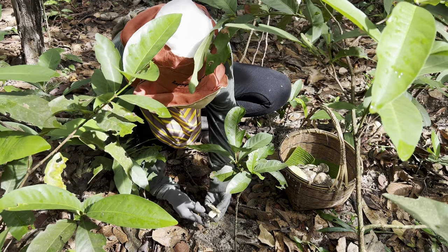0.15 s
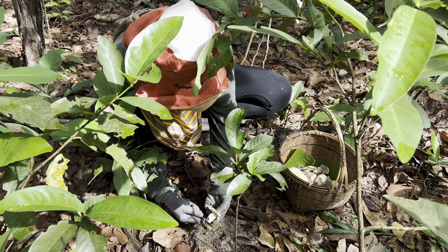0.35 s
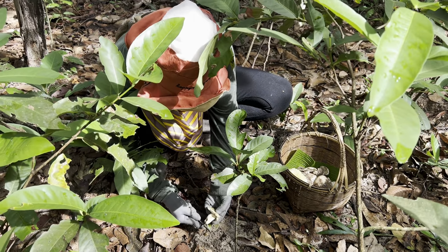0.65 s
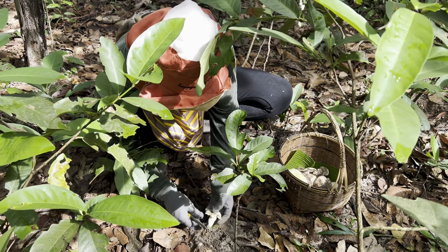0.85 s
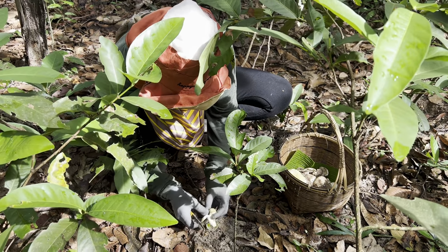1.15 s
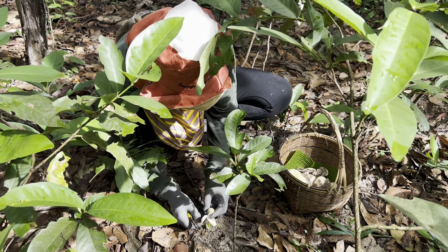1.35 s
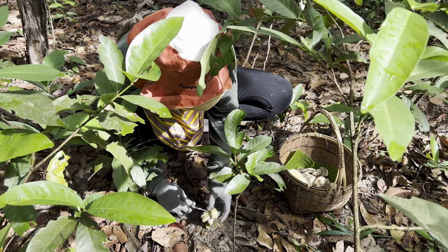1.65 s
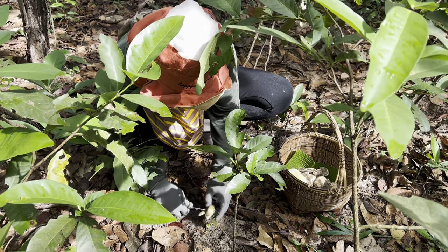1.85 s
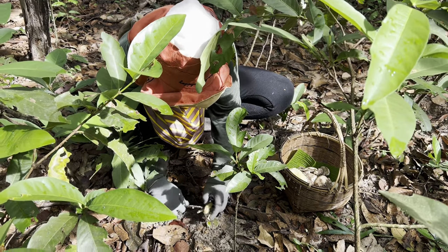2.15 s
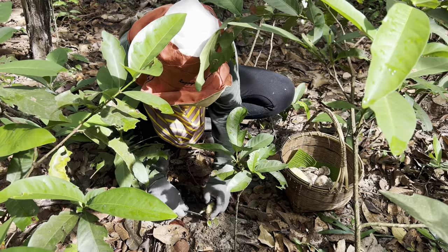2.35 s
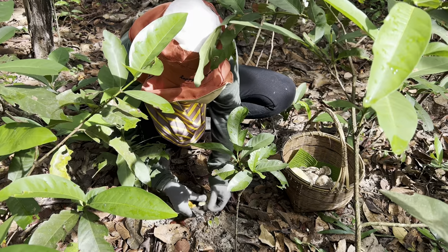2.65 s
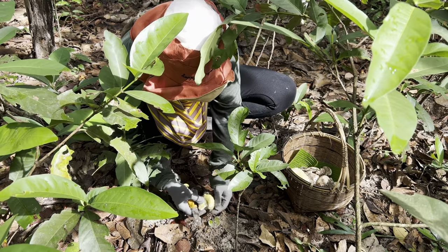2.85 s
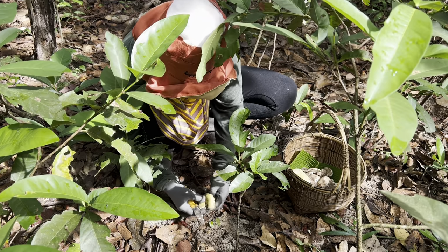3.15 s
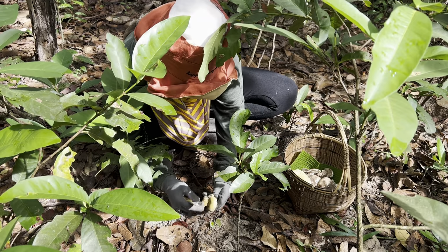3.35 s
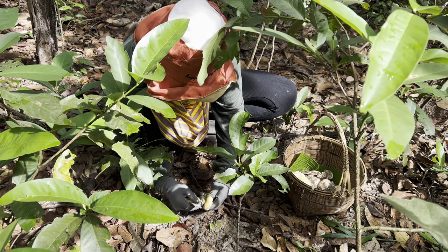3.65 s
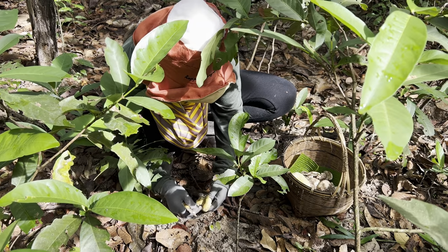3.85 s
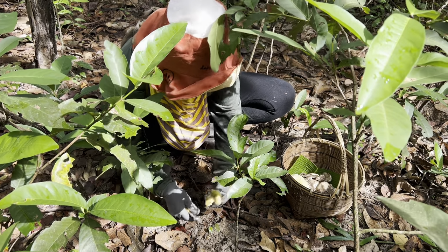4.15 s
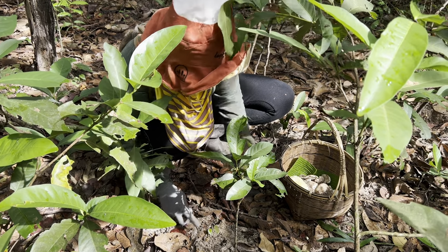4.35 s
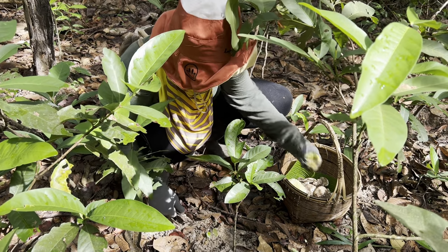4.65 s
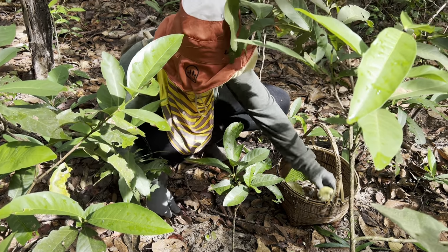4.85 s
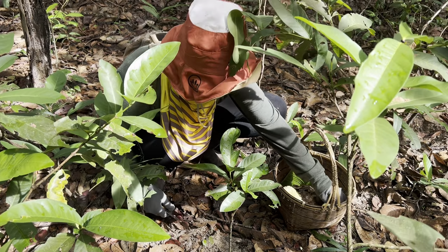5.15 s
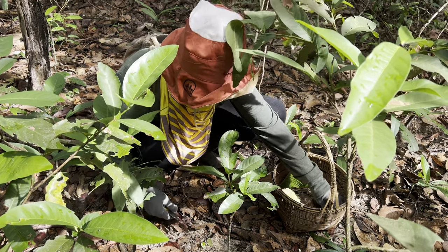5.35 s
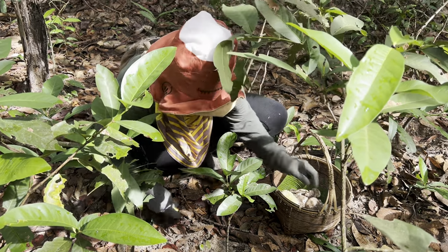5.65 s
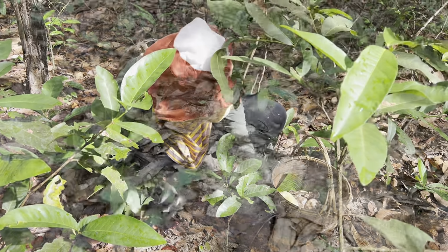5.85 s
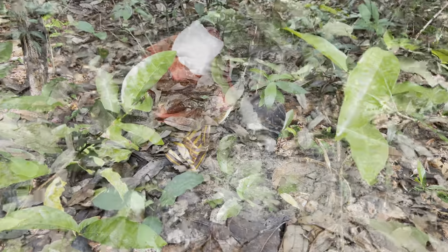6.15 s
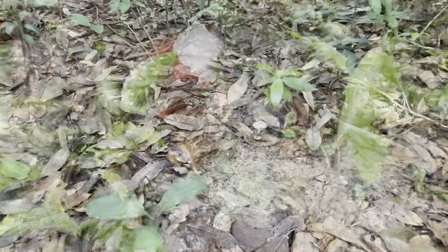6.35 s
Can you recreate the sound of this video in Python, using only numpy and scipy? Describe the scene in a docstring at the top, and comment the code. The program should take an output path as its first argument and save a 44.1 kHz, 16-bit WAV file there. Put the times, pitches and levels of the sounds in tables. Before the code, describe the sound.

A stereo microphone among foliage catches shrill cicadas pulsing rapidly on the left, with low engine-like rumble far behind. Clear short bird whistles glide up and down at the start, echoing off trunks, then stop. Very faint distant birds keep calling. A gloved forager's hands barely stir dry leaves, with sparse ticks and soft rustles after four seconds, before sudden louder crunching steps through leaf litter close the scene.

```python
"""A chorus of cicadas drones to the left while a near bird whistles gliding notes among the trunks.
Behind them far birds call, a distant motor rumbles, dry leaves tick under hands, and at the end
someone wades through the litter. Cicadas are sums of overtones of unsteady click rates, birds are
gliding near-sines, ticks are short coloured noise bursts, and litter and air are shaped noise;
random echoes off trunks and leaves surround the cicadas, birds and ticks."""
import sys
import numpy as np
from scipy import signal
from scipy.fft import rfft, irfft
from scipy.io import wavfile
from scipy.ndimage import uniform_filter1d

SR = 44100
rng = np.random.default_rng(int(sys.argv[2]) if len(sys.argv) > 2 else 0)


def unload_wav(signal):
    """Save mono or channel-first audio to the path in sys.argv[1] as 16-bit WAV at rate SR, clipped to [-1, 1]."""
    wavfile.write(
        sys.argv[1],
        SR,
        np.round(np.clip(np.atleast_2d(signal).T, -1, 1) * 32767).astype(np.int16),
    )


N = 286650  # samples, 6.5 s

# rumble and far forest hush: frequency_hz, relative_density_db
AIR_SPECTRUM = [(15, -45), (25, -28), (41, -10), (64, 0), (166, -17), (216, -30), (350, -35.5),
                (863, -37.5), (1050, -39.5), (2430, -42), (3690, -43.5), (4400, -45.5), (4900, -37.5),
                (6240, -69.5), (8200, -52.5), (9300, -56), (11000, -69.5)]
# swell of the bass: time_s, gain_db
RUMBLE_SWELL = [(0, -1.0), (1.0, -1), (3.3, 1.5), (5.8, -0.2), (6.5, 4.5)]
# likeness of the two ears' noises: frequency_hz, likeness_0_to_1
EAR_LIKENESS = [(60, 0.99), (250, 0.96), (600, 0.25), (1200, 0.2), (3000, 0.041)]
# colour of the leaf litter: frequency_hz, relative_density_db
LITTER_SPECTRUM = [(88, -31.5), (150, -6.5), (238, -8.5), (691, -3), (927, 0), (1070, -4), (1800, -3.5),
                   (2530, 2), (4500, -5.5), (9500, -16), (15000, -16)]
# bands of big, middle, small leaves and crumbs: low_hz, high_hz
LEAF_BANDS = [(120, 1400), (1400, 4500), (4500, 10200), (10200, 16000)]
# hands stirring the litter: start_s, level_db, hold_s, big_against_middle_leaves_db
STIRS = [(4.195, -71, 0.27, -0.5), (4.702, -61, 0.087, -7.5), (4.902, -74, 0.42, -7.5),
         (5.441, -63, 0.097, -2.5), (5.586, -74, 0.25, 0.5)]
# wading through the litter: time_s, level_db, small_against_middle_leaves_db
WADING = [(5.85, -71, -1), (5.858, -50.5, -5), (5.916, -54.5, 6), (5.946, -45, 3.5), (6.132, -46, 1.5),
          (6.188, -39.5, -4.5), (6.24, -45, 0.5), (6.418, -50, -2.5), (6.44, -44, 1), (6.5, -50, -5)]
# leaf and twig ticks: start_s, peak_before_panning_db, centre_hz, left_minus_right_db
TICKS = [(0.533, -42.5, 2060, 3), (1.768, -54, 1940, 6), (2.298, -50, 1734, 2), (2.469, -47.5, 579, 13),
         (3.153, -53, 13000, 0), (3.477, -50, 4780, 8), (3.605, -45.5, 4400, 10), (4.119, -51, 12500, 0),
         (4.292, -40.5, 2970, 7), (4.712, -46, 2980, 12), (5.018, -50.5, 813, 9), (5.26, -43.5, 1020, 3),
         (5.284, -44.5, 4830, -3), (5.425, -43.5, 2730, 7), (5.462, -42.5, 1470, 7),
         (5.513, -42.5, 2290, 15), (5.859, -35.5, 840, 8), (5.921, -40, 2310, 13), (5.964, -43, 2480, 5),
         (6.02, -27, 3150, 12), (6.163, -27, 2900, 4), (6.183, -28, 3170, 16), (6.223, -30.5, 775, -7),
         (6.315, -32.5, 3080, 8), (6.436, -27, 7000, 9)]
# call shapes: share_of_length, pitch_ratio, gain_db
ARCH = [(0, .62, -28), (.28, .8, -15), (.4, 0.97, -4), (.53, 1, 0.5), (.82, .89, -3.5), (.9, .85, -17),
        (1, 0.68, -28)]
CLIMB = [(0, .79, -18), (.15, .89, 3), (.4, 1.01, -1), (.5, .92, 0.5), (.72, 1.09, -3), (1, .94, -7.5)]
FLICK = [(0, .95, -16), (.22, 1.01, -0.5), (.58, .96, -7.5), (.72, 1.08, -5), (.84, 1.24, -14),
         (1, 1.1, -37.5)]
SLUR = [(0, 1.08, -3), (.2, 1, -1), (.8, .67, -3), (1, .6, -12)]
PIP = [(0, 1.08, 0), (1, .9, -3)]
BUZZ = [(0, 1, 0), (.1, 1, -5.5), (.63, 1, 1.5), (.78, 1.12, -2.5), (1, 1.04, -9)]
CROAK = [(0, 0.98, -7), (.08, 0.98, -1), (.92, .97, -7.5), (1, 1, -15)]
# near whistler: shape_name, start_s, length_s, pitch_hz, level_before_beak_and_echoes_db, bend_exponent
WHISTLER_NOTES = [("arch", -.024, .125, 1700, -29, 1.1), ("climb", .187, .155, 1270, -38, 0.96),
                  ("flick", .312, .112, 2040, -30, .45), ("arch", 0.96, .135, 1880, -27, 1.05),
                  ("arch", 1.148, .122, 1750, -25.5, 0.94), ("climb", 1.36, .15, 1280, -37, 1.05),
                  ("flick", 1.508, .112, 1990, -35.5, 1.07)]
# filtering by the whistler's beak: frequency_hz, gain_db
BEAK = [(800, 0), (2600, -1), (3000, -5), (3700, -14), (4100, -32), (6000, -44)]
# far bird, falling slurs: start_s, level_before_echoes_db
FAR_SLURS = [(.52, -69), (.875, -67), (2.96, -68), (3.30, -68), (3.665, -67), (4.025, -67), (4.385, -67),
             (4.74, -69), (5.085, -64), (5.775, -68)]
# far bird, short pips: start_s, pitch_hz, level_before_echoes_db
FAR_PIPS = [(3.4994, 2050, -68.5), (3.6651, 2030, -69.5), (3.7494, 1910, -75), (3.9292, 1910, -72),
            (4.364, 1970, -73)]
# singing males: click_rate_hz, relative_level_db, rate_wobble_share, throb_rate_hz
CICADAS = [(1272, -9, .008, 12.0), (1290, -17, .004, 12.1), (1306, -15, .005, 12.5),
           (1323, -15, .005, 11.8), (1342, -11, .004, 12.4), (1360, -1, .003, 12.2), (1373, -4, .004, 12.6),
           (1387, -1, .003, 12.3), (1395, -6, .002, 12.0), (1405, -13, .002, 12.4),
           (1416, -10, .0015, 12.1), (1425, -6, .002, 12.3)]
# sound let out by drum and belly: frequency_hz, gain_db, left_minus_right_db
BELLY = [(5027, -21.5, 13), (5660, -31.5, 9), (6339, -32.5, 0), (6397, -4, 7), (6860, 2.5, 12),
         (7200, -3.5, 11.5), (7148, -46, 5), (8680, -12.5, 6.5), (8333, -46.5, 5), (9717, -30.5, -3.5),
         (9300, -46, 2), (12000, -59, -8), (12500, -56, -8.5), (13880, -65, -6), (15300, -53.5, -9)]
# whole chorus, fading at the end: time_s, level_db
CHORUS = [(0, -31), (3.1, -31.5), (4.45, -30.5), (5.2, -32), (5.8, -32), (6.5, -37.5)]

AIR_LEAD_S, BIRD_LEAD_S = 0.000669, 0.00051  # how much earlier the left ear hears it
STIR_ATTACK_S, STIR_RELEASE_DB_S = 0.0098, 298
WADING_BIG_DB, STIR_SMALL_DB = -2.5, -5.5  # big, and small outside wading, against middle leaves
CRUMBS_DB, TURNS_DB = -12, 1.86  # crumbs against small leaves; wavering of each leaf size
TICK_HALF_WIDTH_OCTAVES, TICK_FADE_S = 0.91, 0.0043
SLUR_S, SLUR_HZ, PIP_S = 0.1, 3200, 0.018
CROAK_START_S, CROAK_BEATS_HZ, CROAK_BEAT_DB = 1.92, 8.5, 2.5
TOP_HZ = 15750


def undb(db):
    """Decibels express the logarithm of an amplitude ratio; this inverts them."""
    return 10 ** (np.asarray(db) / 20)


def level(x, db):
    """Root-mean-square normalisation scales a signal to a stated level."""
    return x * undb(db) / np.sqrt(np.mean(x ** 2))


def pan(db):
    """Constant-power panning: left and right gains differ by db and keep the power."""
    gains = undb(np.array([db, -np.asarray(db)]) / 2)
    return gains * np.sqrt(2 / np.sum(gains ** 2, axis=0))


def curves(table):
    """Linear interpolation turns each column of a timed table into a curve."""
    times, *columns = np.transpose(table)
    return [np.interp(np.arange(N) / SR, times, column) for column in columns]


def over(hz, table):
    """A spectrum is interpolated on a logarithmic frequency axis."""
    table_hz, values = np.transpose(table)
    return np.interp(np.log(hz + 1), np.log(table_hz), values)


def shape(x, table):
    """Linear filtering multiplies the spectrum by a gain at each frequency."""
    hz = np.fft.rfftfreq(N, 1 / SR)
    return irfft(rfft(x) * undb(over(hz, table)), N)


def walk(rate, size=N):
    """Low-pass randomness: levels held 1 / rate s and slewed twice, with spread near 1."""
    hold = int(SR / rate)
    steps = np.repeat(rng.standard_normal(size // hold + 1), hold)
    slewed = uniform_filter1d(uniform_filter1d(steps, hold), hold)
    return 1.3 * slewed[:size]


def trunks(x, t60, wet_db, lead_s, dull_hz):
    """Diffuse scattering: direct sound plus a decaying, duller echo cloud, another for each ear."""
    size = int(SR * t60)
    t = np.arange(size) / SR
    noise = rng.standard_normal((2, SR))[:, :size]
    cloud = noise * undb(-60 * t / t60) * (1 - np.exp(-t / 0.0022))
    # wet_db holds before the treble is dulled
    cloud *= undb(wet_db) / np.sqrt(np.sum(cloud ** 2, axis=1, keepdims=True))
    dulling = 1 + (np.fft.rfftfreq(size, 1 / SR) / dull_hz) ** 2
    cloud = irfft(rfft(cloud) / dulling, size)
    # the direct sound reaches the right ear lead_s after the left
    taps = np.arange(64) - 8
    cloud[0, :64] += np.sinc(taps)
    cloud[1, :64] += np.sinc(taps - lead_s * SR)
    return signal.fftconvolve(x * np.ones((2, 1)), cloud, axes=1)[:, :x.shape[-1]]


def ears(pair, slow_db, quick_db, quick_rate):
    """Interaural coherence: two noises are mixed to be alike in the bass; each octave wavers alone."""
    hz = np.fft.rfftfreq(N, 1 / SR)
    like = np.clip(over(hz, EAR_LIKENESS), 0, 0.995)
    mid, side = rfft(pair) * np.sqrt([1 + like, 1 - like])
    right_delay = np.exp(-2j * np.pi * hz * AIR_LEAD_S)
    both = np.array([mid + side, (mid - side) * right_delay])
    out = 0
    for low_hz in 20 * 2 ** np.arange(10.):
        octave = (hz >= low_hz) & (hz < 2 * low_hz)
        waver_db = slow_db * walk(3.032) + quick_db * walk(quick_rate)
        out = out + undb(waver_db) * irfft(both * octave, N)
    return out


def air():
    """Broadband noise filtered to a motor's swelling rumble below and the far forest's hush above."""
    noise = ears(shape(rng.standard_normal((2, N)), AIR_SPECTRUM), 1.95, 0.85, 10)
    noise = level(noise, -50.5) * pan(0.73)[:, None]
    bass = shape(noise, [(190, 1), (300, -45.5)])
    swell_db, = curves(RUMBLE_SWELL)
    return noise + bass * (undb(swell_db) - 1)


def rustle():
    """Impulsive friction: dense noise of uneven strength, split by leaf size, each size wavering alone."""
    t = np.arange(N) / SR
    wading_db, small_db = curves(WADING)
    wading = t > WADING[0][0]
    middle = wading * undb(wading_db)
    small_db = np.where(wading, small_db, STIR_SMALL_DB)
    big = middle * undb(WADING_BIG_DB)
    for start, stir_db, hold, big_db in STIRS:
        attack = np.clip((t - start) / STIR_ATTACK_S, 0, 1)
        release_db = STIR_RELEASE_DB_S * np.maximum(t - start - hold, 0)
        stir = attack * undb(stir_db - release_db)
        middle = middle + stir
        big = big + stir * undb(big_db)
    small = middle * undb(small_db)
    crumbs = middle * undb(small_db + CRUMBS_DB)

    # exponential decibel gains make a few samples stand out as cracks
    unevenness = np.minimum(rng.exponential(size=(2, N)), 6.5)
    cracks = rng.standard_normal((2, N)) * undb(3.3 * unevenness + 0.8 * walk(60))
    spectrum = rfft(ears(shape(cracks, LITTER_SPECTRUM), 0.7, 3, 45))
    hz = np.fft.rfftfreq(N, 1 / SR)
    out = 0
    for (low_hz, high_hz), loudness in zip(LEAF_BANDS, [big, middle, small, crumbs]):
        band = irfft(spectrum * (hz >= low_hz) * (hz < high_hz), N)
        out = out + loudness * undb(TURNS_DB * walk(12)) * level(band, 0)
    return out


def ticks():
    """Damped impact: a few ms of decaying noise, band-limited by the size of the leaf or twig."""
    size = 2048
    out = np.zeros((2, N + size))
    t = np.arange(size) / SR
    hz = np.fft.rfftfreq(size, 1 / SR) + 1
    for start, peak_db, centre_hz, pan_db in TICKS:
        snap = rng.standard_normal((2, size)) * np.exp(-t / TICK_FADE_S)
        octaves_off = np.log2(hz / centre_hz)
        snap = irfft(rfft(snap) / (1 + (octaves_off / TICK_HALF_WIDTH_OCTAVES) ** 6), size)
        snap /= np.abs(snap).max()
        first = int(start * SR)
        out[:, first:first + size] += undb(peak_db) * pan(pan_db)[:, None] * snap
    return trunks(out[:, :N], 0.13, -6.0, 0.0003, 5500.0)


def call(form, start, length, pitch_hz, level_db, bend=1):
    """Similarity: one call shape is stretched to a length, pitch and level; bend scales its glide."""
    return [(start + length * share, pitch_hz * ratio ** bend, level_db + gain_db)
            for share, ratio, gain_db in form]


def whistle(notes, second_db, third_db, rough_hz, tremble_rate=250):
    """Frequency modulation: a gliding, trembling near-sine with weak overtones and soft ends."""
    out = np.zeros(N)
    tremble = rough_hz * walk(tremble_rate)
    for note in notes:
        times, pitches, levels = np.transpose(note)
        i = np.arange(max(int(times[0] * SR), 0), int(times[-1] * SR))
        pitch = np.interp(i / SR, times, pitches)
        pitch = uniform_filter1d(pitch, int(0.0051 * SR), mode="nearest")
        phase = 2 * np.pi * np.cumsum(pitch + tremble[i]) / SR
        ends = np.minimum(np.minimum(i - i[0], i[-1] - i) / (0.0015 * SR), 1)
        db = np.interp(i / SR, times, levels)
        # overtones grow more slowly than the main tone
        thin = undb(-0.4 * (db + 40))
        overtones = undb(second_db) * np.sin(2 * phase) + undb(third_db) * np.sin(3 * phase)
        tone = np.sin(phase) + thin * overtones
        out[i] += np.sqrt(2) * undb(db) * ends * tone
    return out


def far_slurs_and_buzz():
    """Amplitude modulation: a 45 Hz flutter makes one far whistle buzz; falling slurs stay smooth."""
    t = np.arange(N) / SR
    slurs = [call(SLUR, start, SLUR_S, SLUR_HZ, db) for start, db in FAR_SLURS]
    buzz = call(BUZZ, start=4.84, length=0.46, pitch_hz=2775, level_db=-64)
    flutter = 1 + 1.73 * np.sin(2 * np.pi * 45 * t + 1.4 * walk(25))
    far = whistle(slurs, -60, -60, 25.0) + flutter * whistle([buzz], -60, -60, 55.0)
    return trunks(far, 0.4, 1, 0.0002, 5000.0)


def far_croak_and_pips():
    """Rapid random pitch modulation makes a beating call hoarse; short pips share its brief echoes."""
    t = np.arange(N) / SR
    croak = call(CROAK, CROAK_START_S, length=0.425, pitch_hz=1530, level_db=-61)
    pips = [call(PIP, start, PIP_S, hz, db) for start, hz, db in FAR_PIPS]
    beats = undb(CROAK_BEAT_DB * np.sin(2 * np.pi * CROAK_BEATS_HZ * (t - CROAK_START_S)))
    far = beats * whistle([croak], -23.5, -64, 150.0, 700.0) + whistle(pips, -58.5, -59, 60.0)
    return trunks(far, 0.096, 1, BIRD_LEAD_S, 3900.0) * pan(4.6)[:, None]


def near_whistler():
    """Source and filter: a gliding whistle passes the beak's low-pass and echoes, to the left."""
    forms = dict(arch=ARCH, climb=CLIMB, flick=FLICK)
    notes = [call(forms[name], *row) for name, *row in WHISTLER_NOTES]
    song = shape(whistle(notes, -18, -25, 18.0), BEAK)
    return trunks(song, 0.55, -0.5, BIRD_LEAD_S, 4500.0) * pan(5.2)[:, None]


def cicadas():
    """Periodic rib clicks have overtones of their rate; each throb makes them faster and louder."""
    size = N + SR // 2  # they sing 0.5 s ahead, so the echoes are already full
    out = np.zeros((2, size))
    t = np.arange(size) / SR
    belly_hz, belly_db, belly_pan = np.transpose(BELLY)
    for click_hz, male_db, wobble, throb_hz in CICADAS:
        drift = walk(0.7, size=size)
        throb = np.cos(2 * np.pi * (throb_hz * t + rng.random() + 0.1 * drift))
        rate = click_hz * (1 + wobble * walk(150, size=size) + 0.0017 * throb + 0.0015 * drift)
        turn = np.exp(2j * np.pi * np.cumsum(rate) / SR)
        # uneven click strength spreads a faint haze around each overtone
        uneven_db = 0.68 * walk(2.845, size=size) + 0.21 * walk(2500, size=size)
        effort = undb(male_db + 8.1 * throb + uneven_db)
        overtone = effort * turn ** 3
        for k in range(4, 12):
            overtone = overtone * turn  # now the k-th multiple of the click rate
            gain_db = np.interp(k * click_hz, belly_hz, belly_db)
            sides = pan(np.interp(k * click_hz, belly_hz, belly_pan))
            out += (undb(gain_db) * sides)[:, None] * overtone.imag
    chorus_db, = curves(CHORUS)
    # far branches give little direct sound; swaying leaves keep shifting between two echo clouds
    sway = np.pi * np.cumsum(1.5 + 0.83 * walk(2.009, size=size)) / SR
    one_path = trunks(out * np.cos(sway), 0.54, 9.2, 0.0003, 10000.0)
    other_path = trunks(out * np.sin(sway), 0.71, 8.4, -0.0002, 19000.0)
    return level((one_path + other_path)[:, -N:], chorus_db)


def scene():
    """Superposition: the pressures of all sources add."""
    birds = far_slurs_and_buzz() + far_croak_and_pips() + near_whistler()
    return air() + rustle() + ticks() + birds + cicadas()


def record(dry):
    """Band limitation: a steep elliptic low-pass cuts the top of the treble."""
    lowpass = signal.ellip(10, 0.2, 80, TOP_HZ, fs=SR, output="sos")
    return signal.sosfilt(lowpass, dry)


dry = scene()
out = record(dry)
unload_wav(out)
```